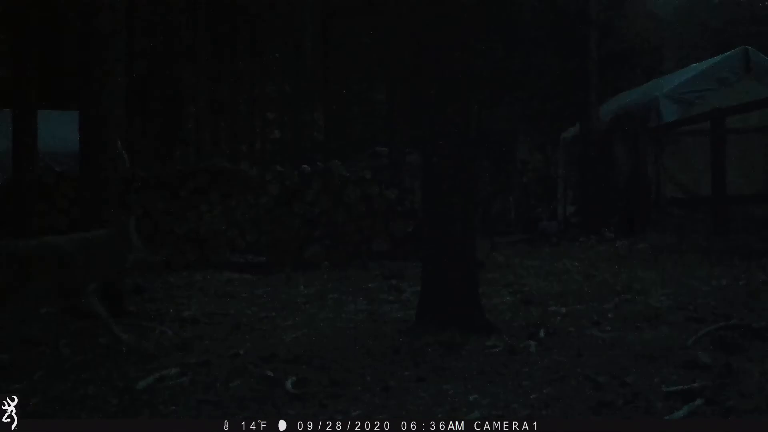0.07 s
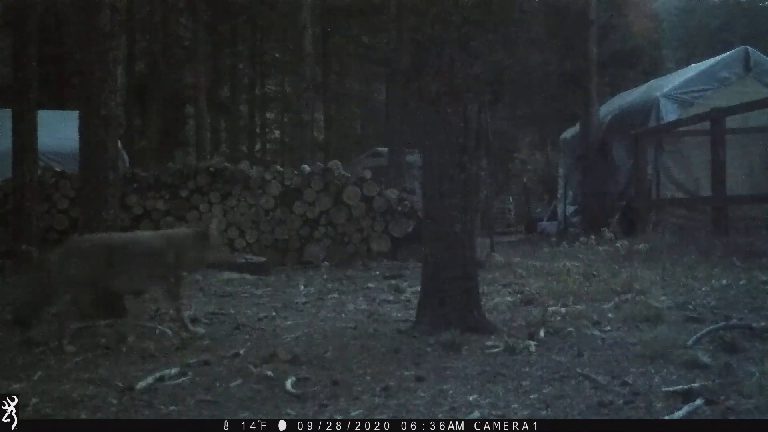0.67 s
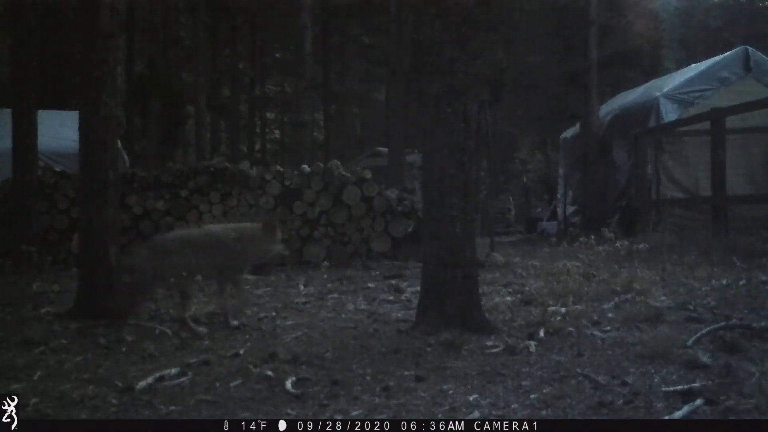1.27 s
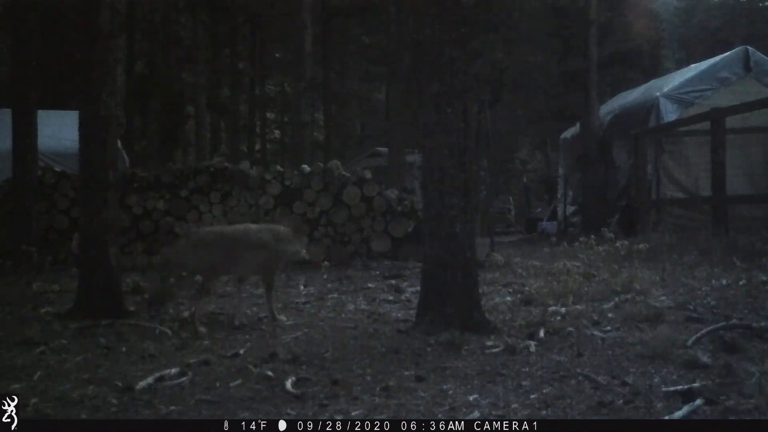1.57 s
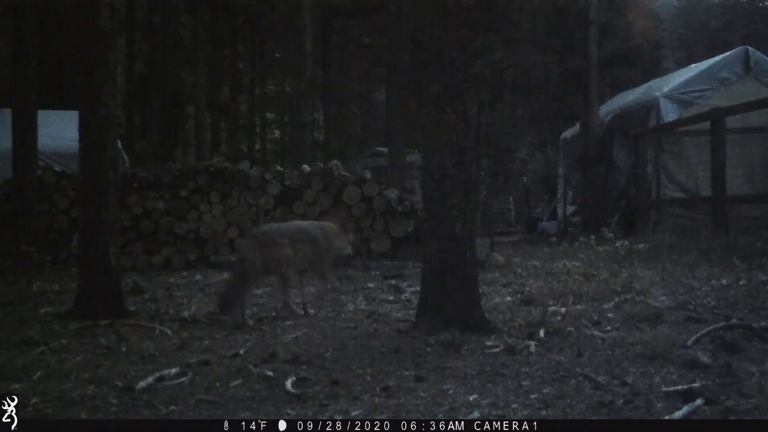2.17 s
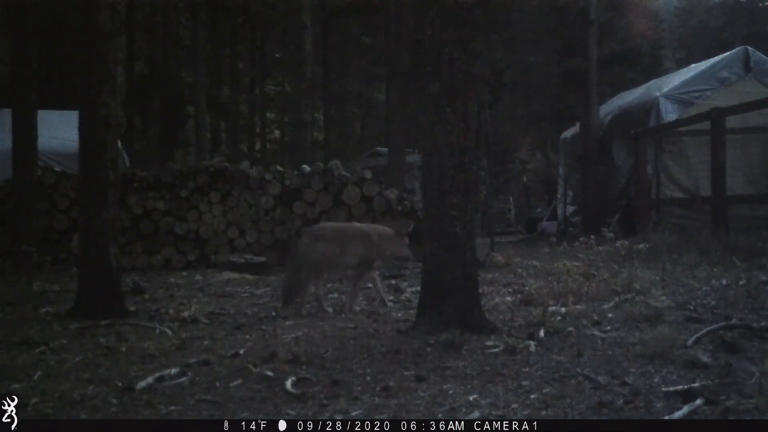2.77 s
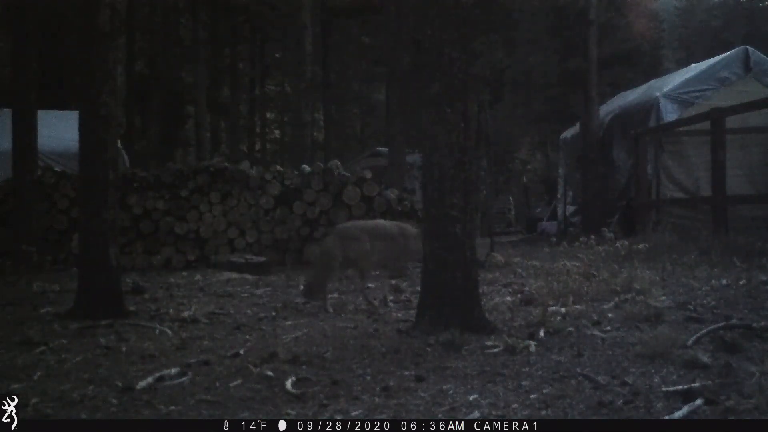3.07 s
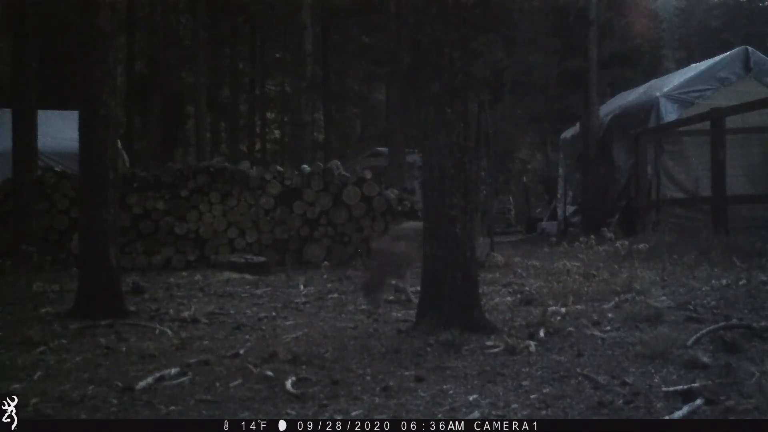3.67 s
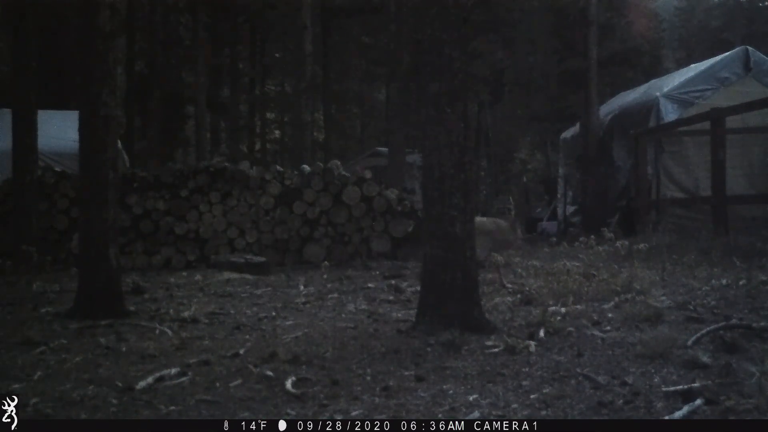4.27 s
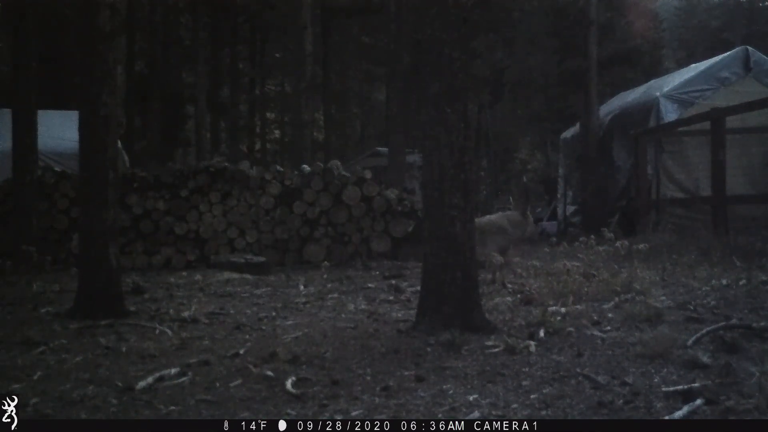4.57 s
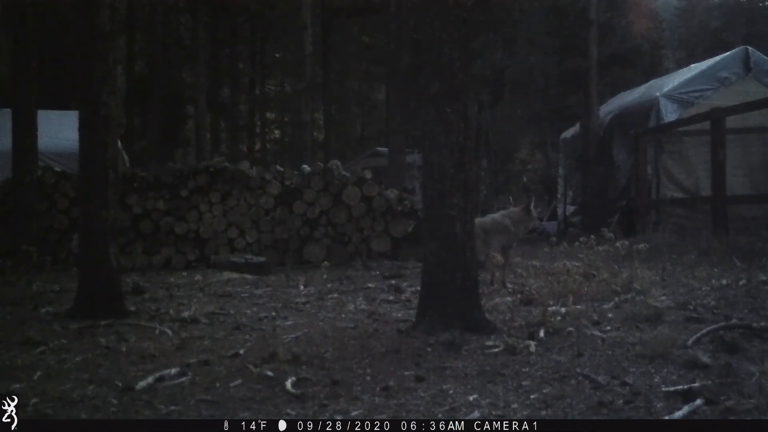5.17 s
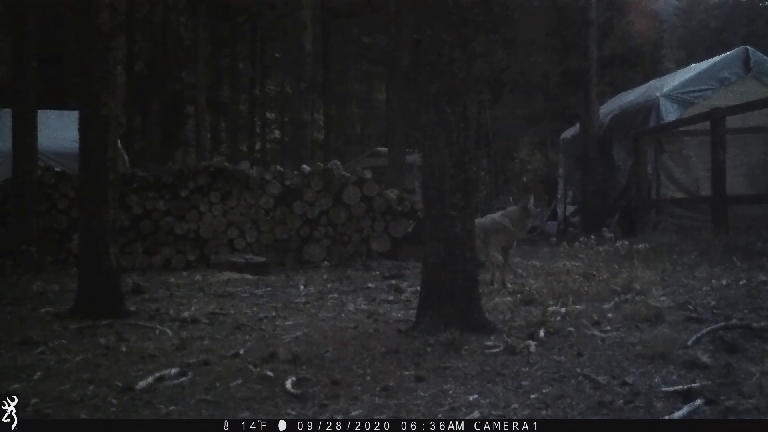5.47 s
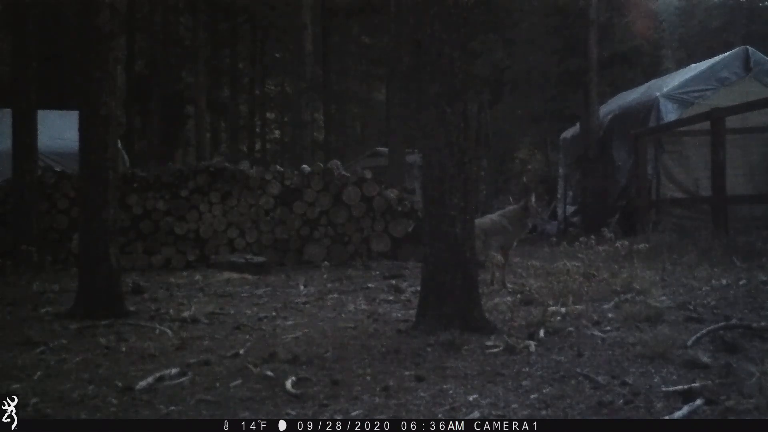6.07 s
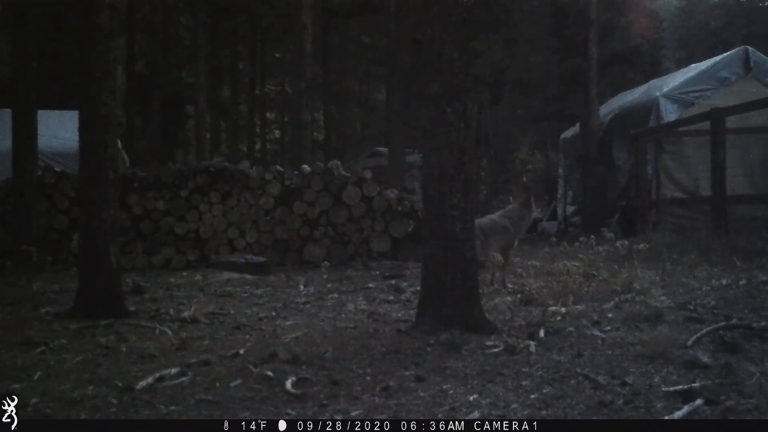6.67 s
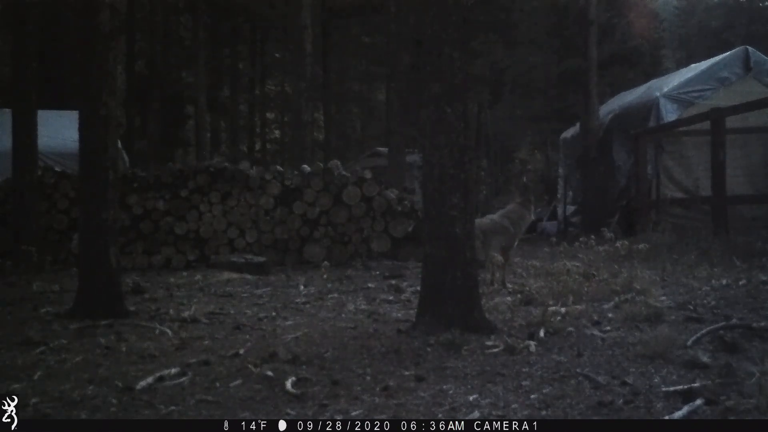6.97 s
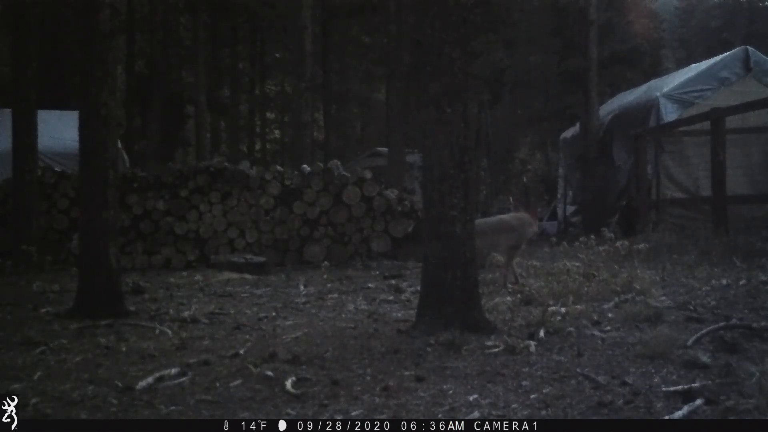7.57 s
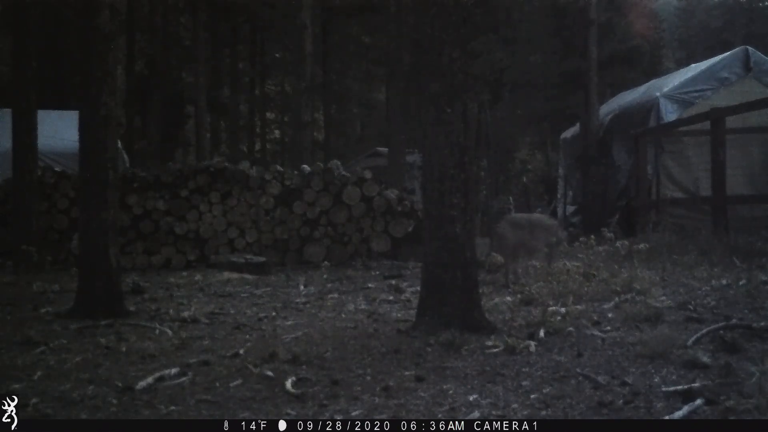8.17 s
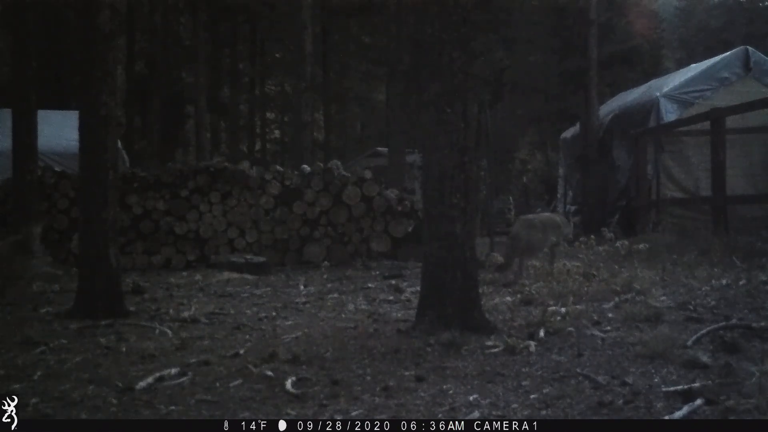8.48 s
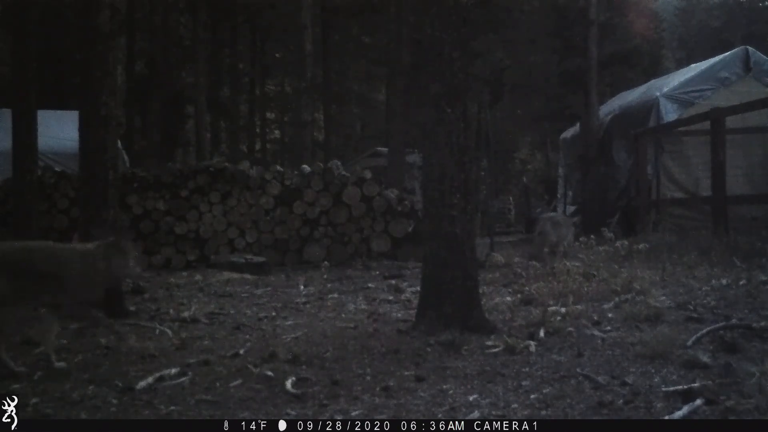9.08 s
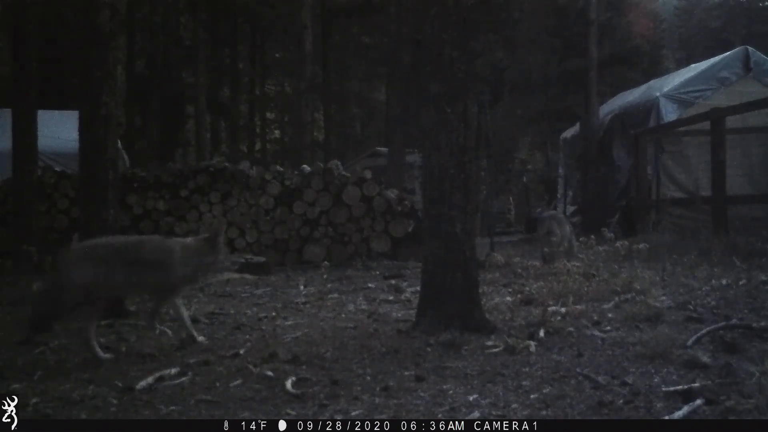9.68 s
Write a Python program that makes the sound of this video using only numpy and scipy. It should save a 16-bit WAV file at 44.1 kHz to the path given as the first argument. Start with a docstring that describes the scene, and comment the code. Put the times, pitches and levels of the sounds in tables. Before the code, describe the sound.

A coyote howls loudly in a quiet wooded yard, after a long stretch of hiss with faint twig snaps and dull bumps.

```python
"""A coyote howls in a quiet wooded yard. First the microphone wakes with a soft thud and a steady hiss.
Then paws snap twigs and brush dry leaves, among a few dull bumps and one light knock.
At about 8.2 s the howl scoops up, cracks, and breaks into a rough scream as the vocal folds lose their
regular beat. A second later it settles on a clean, slowly sinking note that frays at the end.
All through the howl, the trees throw the voice back."""
import sys
import numpy as np
from scipy import signal
from scipy.fft import rfft, irfft, next_fast_len
from scipy.io import wavfile

SR = 44100
rng = np.random.default_rng(int(sys.argv[2]) if len(sys.argv) > 2 else 0)


def store_wav(level_fs):
    """Save 16-bit WAV to argv[1]."""
    pcm = np.round(np.clip(np.atleast_2d(level_fs), -1, 1) * 32767)
    wavfile.write(sys.argv[1], SR, pcm.T.astype(np.int16))


N = 438354
TIME = np.arange(N) / SR
PADDED = next_fast_len(N, True)
FREQS = np.fft.rfftfreq(PADDED, 1 / SR)

# tone of the microphone's hiss: frequency_hz, relative_level_db
HISS_SPECTRUM = [(12, -29), (20, 0.5), (37, 0), (64, -0.5), (129, -3), (218, -5), (244, -7), (313, -5),
                 (340, -8.5), (402, -8.5), (610, -11.5), (663, -11.5), (1570, -17), (14100, -24),
                 (15300, -23)]
# dull bumps: start_s, level_db, pitch_hz
DULL_BUMPS = [(0.189, -43, 98), (.99, -43, 95), (2.051, -33, 80), (2.11, -41, 61), (6.31, -40.5, 68),
              (6.38, -40.5, 66.4), (6.52, -43.5, 65), (6.812, -38.5, 66.5), (6.861, -41, 83)]
# the tones of one light wooden knock: pitch_hz, level_db, rise_s
KNOCK_TONES = [(354, -38, 0.0036), (814, -40, 0.00089), (1400, -44, 0.0016)]
# twigs and dry leaves snapping underfoot: start_s, relative_level_db
TWIG_SNAPS = [(0.3122, -34), (0.3805, -41), (0.428, -35), (7.4046, -36), (7.452, -35), (9.186, -31),
              (9.7512, -35), (9.8777, -26)]
# paws brushing the leaves: start_s, level_db, centre_hz, length_s
LEAF_RUSTLES = [(0.71, -55.5, 2750, 0.058), (0.714, -59, 4600, 0.032), (2.074, -57, 1840, .03),
                (3.3, -62, 6300, .04), (6.281, -58.5, 1650, 0.091), (6.304, -55, 320, 0.15),
                (8.04, -59.5, 3720, 0.045)]
# how long the echo of the trees takes to fade by 60 dB: frequency_hz, fade_s
ECHO_FADES = [(300, 0.6), (1500, 0.63), (3000, 1), (6000, 0.98), (12000, 0.085)]
# broad resonances of the throat, narrow ones on the way to the microphone: centre_hz, width_hz, gain_db
RESONANCES = [(612, 57, -21), (740, 120, -26.5), (822, 44, -17), (1257, 50, -8), (1463, 98, -0.5),
              (1583, 126, 2.5), (1620, 26, -6), (1850, 30, -8), (1990, 29, 5), (1940, 10, 4),
              (2076, 27, 10.5), (2070, 300, -1), (2210, 116, 0.5), (2715, 110, -5), (2980, 54, 5.5),
              (3082, 46, -0.5), (3178, 33, 5.5), (3430, 180, -6.5), (3770, 170, -17), (4216, 56, -10.5),
              (4530, 160, -21.5), (5090, 270, -4.5), (5146, 51, 1), (5275, 71, 0.5), (5260, 45, -12),
              (6260, 500, -27), (6700, 250, -24), (7330, 280, -16), (7360, 78, -9.5), (8310, 100, -19.5)]
# borders of the voice's five bands (lowest tone, main tone, bright middle, shrill ring, thin edge): edge_hz
BAND_EDGES = [0, 1000, 1850, 4800, 5900, 10000]
# how readily each of those bands turns rough: roughness_factor
BAND_ROUGHNESS = (1.3, 0.7, 1.22, 1.5, 1.4)
# brief dips of the main tone: time_s, depth_db, half_width_s
MAIN_DIPS = [(8.55, -9, 0.042), (9.215, -6.5, 0.043), (9.415, -4, 0.035), (9.508, -12.5, 0.016),
             (9.659, -17, .024), (9.815, -4, 0.036)]
# the coyote's effort, as the loudness of the bright middle: time_s, level_db
VOICE_EFFORT = [(8.21, -48), (8.276, -33), (8.348, -39), (8.404, -34), (8.572, -48), (8.662, -32.5),
                (9.172, -33), (9.318, -41.5), (9.848, -37.5), (9.92, -36)]
# every second pulse of the folds weakens for a while: start_s, end_s, amount_outside, amount_inside (0-1)
WEAK_PULSES = (8.52, 9.74, 0.2, 0.96)
# the top two bands at full effort, before fading: early_db, scream_db, late_db, db_per_effort_db
SHRILL_RING, THIN_EDGE = (-57.5, -40.5, -52, 0.14), (-52, -53, -52, 0.6)

MIC_ON_S, KNOCK_S = 0.106, 6.743
HOWL_S, CRACK_S, SCREAM_S, SETTLE_S, FRAY_S = 8.197, 8.326, 8.603, 9.205, 9.68  # stages of the howl
CRACK_EASE_S = 0.01304
LOUDEST_S, LOUDEST_DB, FULL_EFFORT_DB = 9.353, -23, -32.5
SWELL_DB_PER_S, FADE_DB_PER_S, TOP_FADE_DB_PER_S = 7, 13.5, 9


def gain_of(db):
    """Turns decibels into a number to multiply by."""
    return 10 ** (np.asarray(db) / 20)


def unit_level(x):
    """Scales a sound to an average (rms) level of 1."""
    return x / np.sqrt(np.mean(x ** 2) + 1e-20)


def look_up(table, hz):
    """Reads between a table's rows, on a logarithmic frequency scale."""
    row_hz, values = np.transpose(table)
    return np.interp(np.log(hz + 1), np.log(row_hz + 1), values)


def add(mix, start_s, sound):
    """Mixes a sound in at the given time."""
    part = mix[round(start_s * SR):][:len(sound)]
    part += sound[:len(part)]


def hump(centre_hz, width_hz):
    """A resonance: gain 1 at its centre, falling away on both sides."""
    return 1 / (1 + ((FREQS - centre_hz) / (.78 * width_hz)) ** 2)


def noise(gain):
    """Noise of level 1, shaped by a gain for each frequency."""
    return unit_level(irfft(rfft(rng.standard_normal(PADDED)) * gain, PADDED)[:N])


def after(time_s, ease_s):
    """Passes smoothly from 0 to 1 around the given time."""
    return .5 + .5 * np.tanh((TIME - time_s) / (2 * ease_s))


def stages(values, times_s, ease_s=0.017):
    """Holds each value in turn, easing into the next at the given times."""
    steps = zip(values, values[1:], times_s)
    return values[0] + sum((new - old) * after(time_s, ease_s) for old, new, time_s in steps)


def hiss(level_db=-47.5):
    """Steady noise of the microphone, heavier in the bass."""
    return gain_of(level_db) * noise(gain_of(look_up(HISS_SPECTRUM, FREQS)))


def switch_on(size=0.075, rise_s=0.0095, settle_s=0.32):
    """The microphone's voltage jumps as it wakes, then settles: a soft thud."""
    t = np.maximum(TIME - MIC_ON_S, 0)
    return size * np.minimum(t / rise_s, 1) * np.exp(-t / settle_s)


def thud(level_db, pitch_hz, rise_s, sag=0.11):
    """A tone that swells and dies within a few cycles, its pitch sagging."""
    age = TIME[:SR // 2] / rise_s
    cycles = np.cumsum(pitch_hz * (1 + sag * (np.exp(-age) - .5))) / SR
    return gain_of(level_db) * age * np.exp(1 - age) * np.sin(2 * np.pi * cycles)


def bumps(rise_cycles=1.05):
    """Dull bumps, the deeper ones slower, and one light wooden knock."""
    out = np.zeros(N)
    for start_s, level_db, pitch_hz in DULL_BUMPS:
        add(out, start_s, thud(level_db, pitch_hz, rise_cycles / pitch_hz))
    add(out, KNOCK_S, sum(thud(db, hz, rise_s) for hz, db, rise_s in KNOCK_TONES))
    return out


def footsteps(snap_boost_db=2.5, snap_s=0.00028, crumble=0.1, crumble_s=0.0095, spread=0.21):
    """Twigs snap with a short crumbling tail; leaves brush under the paws."""
    out, t = np.zeros(N), TIME[:SR // 20]
    twig = signal.butter(2, [5100, 9600], "band", fs=SR, output="sos")
    fade = np.exp(-t / snap_s) + crumble * np.exp(-t / crumble_s)
    for start_s, db in TWIG_SNAPS:
        snap = signal.sosfilt(twig, rng.standard_normal(len(t)) * fade)
        add(out, start_s, gain_of(db + snap_boost_db) * snap / abs(snap).max())
    for start_s, db, hz, length_s in LEAF_RUSTLES:
        leaves = signal.butter(2, [hz * (1 - spread), hz * (1 + spread)], "band", fs=SR, output="sos")
        grains = signal.sosfilt(leaves, rng.laplace(size=SR // 2))[:round(length_s * SR)]
        add(out, start_s, gain_of(db) * unit_level(grains * signal.windows.hann(len(grains))))
    return out


def tree_echo(sound, gap_samples=20):
    """Scattered echoes off the trunks, the highest treble dying first."""
    echoes = np.zeros(SR)
    slots = np.arange(gap_samples ** 2, SR - gap_samples, gap_samples)
    echoes[slots + rng.integers(0, gap_samples, len(slots))] = rng.choice([-1., 1.], len(slots))
    hz, t, spectrum = signal.stft(echoes, SR, nperseg=256)
    fade = gain_of(-60 * t / look_up(ECHO_FADES, hz)[:, None])
    tail = signal.istft(spectrum * fade, SR)[1]
    return signal.fftconvolve(sound, tail / np.linalg.norm(tail))[:len(sound)]


def throat(hz, low_hz, high_hz):
    """How strongly the resonances of one band pass each frequency."""
    power = sum((gain_of(db) * hump(centre, width)) ** 2
                for centre, width, db in RESONANCES if low_hz < centre <= high_hz)
    return np.interp(hz, FREQS, np.sqrt(power))


def waver(length, depth_db=3.5, fastest_hz=10, count=8):
    """A few slow random waves make one overtone drift louder and softer."""
    speeds, starts = rng.random((2, count, 1))
    t = np.linspace(0, length / SR, 400)
    waves = np.sin(2 * np.pi * (fastest_hz * speeds * t + starts)).sum(0)
    return np.interp(TIME[:length], t, gain_of(depth_db * np.sqrt(2 / count) * waves))


def vocal_folds(pitch, phase, weakening, low_hz, high_hz, between_db=-10, tilt_db=-0.07, slope=1.07):
    """Regular pulses ring the throat; weakening every second one adds tones between the overtones."""
    tones, power = 0, 1e-20
    halves = np.arange(2, 29)  # multiples of half the pitch; odd ones are the in-between tones
    for k, passed in zip(halves, throat(pitch * halves[:, None] / 2, low_hz, high_hz)):
        share = gain_of(between_db + tilt_db * k) * weakening if k % 2 else 1
        size = passed * k ** -slope * share * waver(len(pitch))
        tones = tones + size * np.cos(phase * k / 2 + 2 * np.pi * rng.random())
        power = power + size ** 2 / 2
    return tones / np.sqrt(power)


def melody(start_hz=505, scoop_hz_per_s=1000, top_hz=780.8, top_s=9.25):
    """Pitch in Hz: a quick scoop up, then a jump onto an arch that sinks faster than it rose."""
    scoop = start_hz + scoop_hz_per_s * np.maximum(TIME - HOWL_S, 0)
    bend_hz_per_s2 = np.where(TIME < top_s, 33, 131)
    arch = top_hz - bend_hz_per_s2 * (TIME - top_s) ** 2
    return stages([scoop, arch], [CRACK_S], CRACK_EASE_S)


def band_levels(open_s=0.011, close_s=0.02, scoop_db=-5, scream_db=-2.5):
    """Levels in dB of the five bands: the low two swell and fade, the upper three follow effort."""
    effort = np.interp(TIME, *np.transpose(VOICE_EFFORT))
    before_s, past_s = np.maximum(LOUDEST_S - TIME, 0), np.maximum(TIME - LOUDEST_S, 0)
    arch = LOUDEST_DB - SWELL_DB_PER_S * before_s - FADE_DB_PER_S * past_s
    lowest = arch + stages([-30, -24], [SCREAM_S], close_s)
    dips = sum(db * np.exp(-((TIME - time_s) / width_s) ** 2) for time_s, db, width_s in MAIN_DIPS)
    # the main tone is weak until the pitch reaches its resonance, and gives way during the scream
    scooping = 1 - after(CRACK_S, CRACK_EASE_S)
    screaming = after(SCREAM_S, open_s) - after(SETTLE_S, close_s)
    main = arch + dips + scream_db * screaming + scoop_db * scooping
    levels = [lowest, main, effort]
    for *stage_db, follow in (SHRILL_RING, THIN_EDGE):
        full = stages(stage_db, [SCREAM_S, SETTLE_S], open_s)
        levels.append(full + follow * (effort - FULL_EFFORT_DB) - TOP_FADE_DB_PER_S * past_s)
    return levels


def howl(jitter=0.0013, rough_jitter=0.0172, flutter_hz=45, rasp=0.34, rasp_hz=70, attack_s=0.045):
    """The vocal folds pass from regular pulses to chaos and back, and the trees echo the voice."""
    pitch = melody()
    roughness = stages([0.15, 0.446, 0.706, 0.02, 0.13], [CRACK_S, SCREAM_S, SETTLE_S, FRAY_S])
    start_s, end_s, slight, full = WEAK_PULSES
    weakening = stages([slight, full, slight], [start_s, end_s])
    echo_gain = gain_of(stages([-3.5, -10.5, -7.5], [SETTLE_S, FRAY_S]))
    # the pitch trembles more as the folds lose their regular beat
    tremble = (jitter + rough_jitter * roughness) * noise(hump(0, flutter_hz))
    phase = 2 * np.pi * np.cumsum(pitch * (1 + tremble)) / SR
    # chaotic pulses come in uneven bursts
    bursts = unit_level(np.exp(rasp * noise(hump(0, rasp_hz))))
    on = slice(round(HOWL_S * SR), N)
    voice = np.zeros(N)
    for low_hz, high_hz, db, factor in zip(BAND_EDGES, BAND_EDGES[1:], band_levels(), BAND_ROUGHNESS):
        broken = np.clip(factor * roughness[on], 0, 1)
        clean = vocal_folds(pitch[on], phase[on], weakening[on], low_hz, high_hz)
        chaos = (bursts * noise(throat(FREQS, low_hz, high_hz)))[on]
        direct = np.sqrt(1 - broken) * clean + np.sqrt(broken) * chaos
        # voice and echo share the band's loudness
        heard = (direct + echo_gain[on] * tree_echo(direct)) / np.hypot(1, echo_gain[on])
        voice[on] += gain_of(db[on]) * heard
    return voice * np.clip((TIME - HOWL_S) / attack_s, 0, 1)


def scene():
    """The howl and its echo over the small sounds of the yard."""
    return (howl() + footsteps() + bumps() + hiss())[None]


def record(dry, wake_s=0.009, cutoff_hz=15400):
    """The microphone wakes after a moment, and the highest treble is cut off."""
    live = dry * np.clip((TIME - MIC_ON_S) / wake_s, 0, 1) + switch_on()
    treble_cut = signal.firwin(511, cutoff_hz, window=("kaiser", 9), fs=SR)
    return signal.oaconvolve(live, treble_cut[None], "same")


dry = scene()
out = record(dry)
store_wav(out)
```